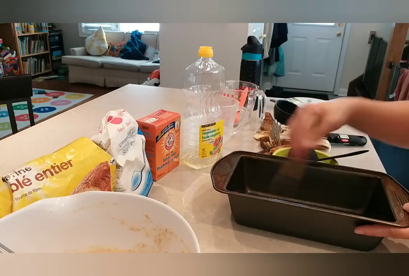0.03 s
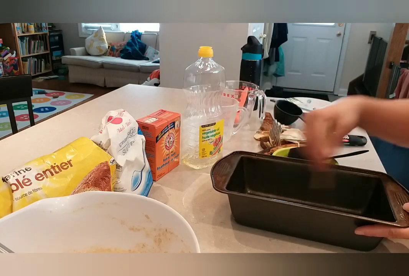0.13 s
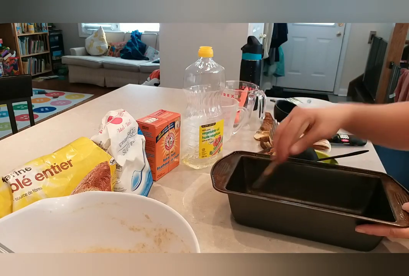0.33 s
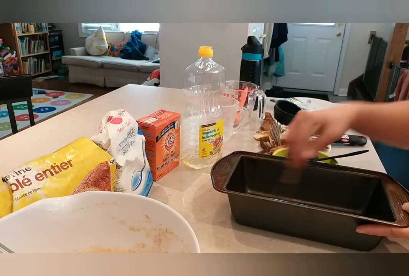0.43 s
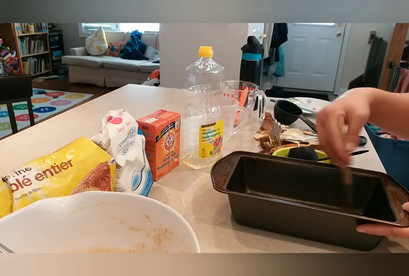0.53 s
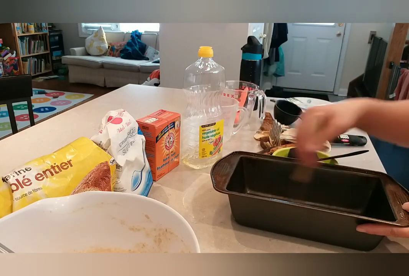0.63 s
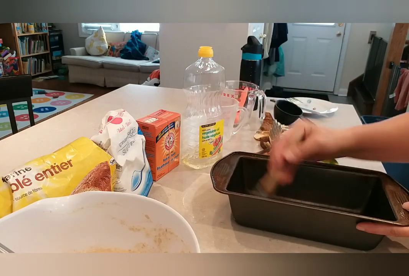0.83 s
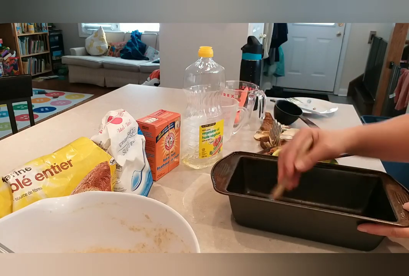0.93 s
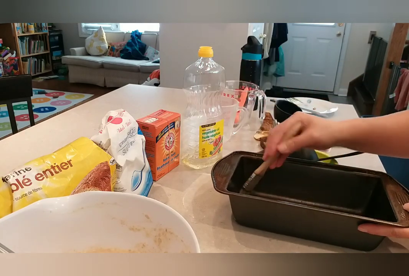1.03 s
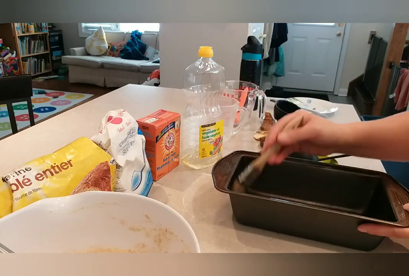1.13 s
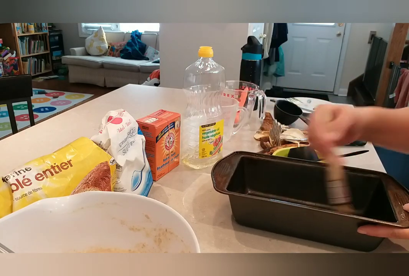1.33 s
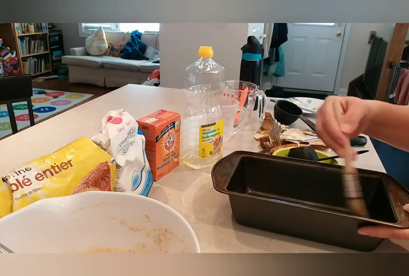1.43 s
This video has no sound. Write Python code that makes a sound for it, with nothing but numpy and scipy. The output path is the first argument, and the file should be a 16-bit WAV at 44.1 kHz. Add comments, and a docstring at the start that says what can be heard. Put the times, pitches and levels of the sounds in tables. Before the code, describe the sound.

A pastry brush rubs the inside of a metal loaf pan in quick, hissing strokes. It knocks the wall twice early on, each clank ringing briefly. Heard from nearby in a kitchen with a faint appliance hum.

```python
"""Bristles hiss over metal: a pastry brush greases a thin loaf pan, about six strokes a second.
Friction and tiny bristle flicks make the hiss; pressure drives the sheet and its modes.
An appliance hums faintly in the kitchen throughout.
Twice the brush knocks the wall and rebounds; the hand-held pan clanks and rings briefly."""
import sys
import numpy as np
from scipy import signal
from scipy.fft import rfft, irfft
from scipy.io import wavfile

SR = 44100
rng = np.random.default_rng(int(sys.argv[2]) if len(sys.argv) > 2 else 0)


def to_wav(sig):
    """Store sig (one row per channel, or 1-D mono) as 16-bit WAV at the path in sys.argv[1].

    Samples outside -1..1 are clipped; the rate is SR.
    """
    pcm = np.clip(np.atleast_2d(sig), -1, 1) * 32767
    pcm = np.round(pcm).astype(np.int16)
    wavfile.write(sys.argv[1], SR, pcm.T)  # frames by channels


N = 66150
TIME_S = np.arange(N) / SR
FREQ_HZ = np.fft.rfftfreq(N, 1 / SR)

# brush strokes: (peak time [s], rise width [s], fall width [s], level [dB], pressure re level [dB])
STROKES = [(-.01, 0.054, 0.036, -45, 3.5), (.095, 0.026, 0.047, -40.5, -2), (.278, 0.049, 0.03, -42, 10),
           (0.452, 0.036, 0.05, -42.5, 1), (.635, 0.046, 0.12, -46, 1), (.78, 0.021, 0.051, -47.5, 2.5),
           (0.973, 0.061, 0.019, -49, -3), (1.11, 0.043, 0.042, -45, 1.5),
           (1.245, 0.022, 0.037, -33.5, 1.5), (1.483, 0.036, .05, -40.5, 0)]
# bristle-tip hiss: (frequency [Hz], gain [dB])
BRISTLE_SPECTRUM = [(1000, -27), (2500, -8), (4500, -8.5), (6200, -5.5), (7000, 1), (8700, 5.8), (10000, 2),
                    (11200, -1.5), (15500, -0.5)]
# rubbed sheet metal: (frequency [Hz], gain [dB])
SHEET_SPECTRUM = [(250, -23.5), (600, -13.5), (1100, -15), (1600, -11.5), (2400, -14.5), (3600, -7),
                  (5000, -11), (8000, -18), (15000, -48)]
# clear pan modes, close pairs beating:
# (frequency [Hz], t60 [s], level at spot 1 [dB], level at spot 2 [dB], relative rubbed gain [dB])
PAN_MODES = [(407, 0.052, -28, -27.5, -46), (468.6, 0.15, -39.5, -22, -24.5), (473.5, 0.083, -22, -30, -38),
             (636.6, 0.33, -35.5, -34, -59), (744, .6, -35.5, -54, -52), (753.5, .6, -35, -44, -52),
             (849, .22, -28.5, -31, -40), (876, .048, -28, -17, -26), (942, .048, -23, -16.5, -24),
             (1081, 0.1, -24, -34, -45), (1120, 0.18, -31, -32, -21), (1433, 0.31, -32, -42, -33),
             (1549, 0.073, -22, -24.5, -35), (1774, 0.31, -31.5, -37.5, -30.5),
             (1795, 0.53, -39, -42.5, -53), (2018, 0.068, -21.5, -25.5, -30), (2255, 0.38, -35, -50, -44),
             (2336, 0.14, -24.5, -38, -56), (2627, 0.12, -21.5, -31.5, -46), (2842, 0.18, -31, -35.5, -28),
             (2984, 0.12, -27, -45, -45), (3082, 0.39, -35.5, -64, -49), (3080, 0.15, -21, -38, -56),
             (3281, 0.034, -36, -16, -23), (3347, 0.25, -25, -45, -36.5), (3710, 0.15, -22, -28, -31.5),
             (4012, 0.23, -29, -33, -33), (4580, .2, -28, -35, -38), (5290, 0.17, -38, -46, -26),
             (6245, 0.16, -54, -36, -30), (7900, 0.13, -43, -48, -28), (10000, 0.059, -31, -32.5, -29)]
# kitchen decay: (frequency [Hz], t60 [s])
ROOM_DECAY = [(300, 0.8), (800, 0.51), (2000, 0.4151), (4000, 0.4637), (8000, 0.46), (15000, 0.5)]
# reverb colour: (frequency [Hz], gain [dB])
ROOM_SPECTRUM = [(350, -6), (800, 3), (2000, 5), (4000, 4), (6000, -4.5), (9000, 1), (14000, -4.5)]
# room air: (frequency [Hz], gain [dB])
AIR_SPECTRUM = [(20, -54), (40, -48.5), (60, -41), (110, -47.5), (200, -34.5), (300, -47), (430, -46.5),
                (650, -45.5), (1100, -53.5), (2500, -61.5), (6000, -60.5), (15000, -95)]
# appliance hum: (frequency [Hz], rms level [dB])
HUM_LINES = [(85.5, -67), (171, -67), (214, -67), (236, -66), (645, -68.5)]
# wall knocks, one per spot: (time [s], level [dB], clank t60 [s], crack gain [dB], room gain [dB])
KNOCKS = [(.1998, -2, 0.15, 3, -13), (.6857, -3.5, 0.11, 5, -12.5)]
# crowded short-lived pan modes: (frequency [Hz], gain at spot 1 [dB], gain at spot 2 [dB])
CLANK_SPECTRA = [(270, -47, -31), (405, -19, -10), (448, -8.5, -16), (545, -13.5, -14.5), (835, -9.5, -6.5),
                 (1250, -9, -13.5), (1820, -9, -11.5), (2610, -10.5, -17), (3880, -9.5, -13.5),
                 (4100, -16, -29), (4610, -7, -22), (5600, -14, -18), (6600, -12, -26), (7900, -7, -14.5),
                 (9580, -11.5, -18), (10580, -17, -31), (15700, -22, -34)]
# stereo side signal: (frequency [Hz], gain re mid [dB])
SIDE_SPECTRUM = [(2000, -54), (3300, -49), (3900, -16.5), (4500, -12.5), (5500, -12), (6300, -43),
                 (7200, -62), (13700, -56), (14500, -16), (15800, -16)]

HOLLOW_DB, HOLLOW_T60_S = -7.5, 0.096  # echoes between the pan's walls


def from_db(db):
    """Decibels to gain."""
    return 10 ** (np.asarray(db) / 20)


def unit_rms(x):
    """Scale to unit rms."""
    return x / np.sqrt(np.mean(x ** 2) + 1e-20)


def per_bin(points):
    """Interpolate (frequency, value) points at the FFT bins, in log frequency."""
    hz, values = np.transpose(points)
    return np.interp(np.log(np.maximum(FREQ_HZ, 1)), np.log(hz), values)


def coloured(x, spectrum):
    """Filter by a gain curve."""
    return irfft(rfft(x) * from_db(per_bin(spectrum)), N)


def noise(spectrum):
    """Coloured Gaussian noise."""
    return coloured(rng.standard_normal(N), spectrum)


def decay(start_s, t60_s):
    """Sudden onset, exponential decay."""
    return (TIME_S >= start_s) * np.exp(-np.log(1000) * np.maximum(TIME_S - start_s, 0) / t60_s)


def echoes(x, response):
    """Convolve with a response scaled to unit energy."""
    return signal.fftconvolve(x, response / np.sqrt(np.sum(response ** 2)))[:N]


def bristle_grain(flicks_per_s=4500, spread_db=1.5, flick_db=-3):
    """Smooth friction plus tiny random bristle flicks."""
    sizes = from_db(-spread_db * np.minimum(rng.exponential(1, N), 5))
    signs = rng.choice([-1, 1], N)
    flicks = sizes * signs * (rng.random(N) < flicks_per_s / SR)
    return unit_rms(rng.standard_normal(N) + from_db(flick_db) * unit_rms(flicks))


def brush(room_db=-13.5):
    """Hiss follows brush speed; pressure makes the sheet sound along."""
    speed, pressure = np.zeros(N), np.zeros(N)
    for peak_s, rise_s, fall_s, level_db, pressure_db in STROKES:
        offset = (TIME_S - peak_s) / np.where(TIME_S < peak_s, rise_s, fall_s)
        swell = from_db(level_db) * np.exp(-0.5 * np.abs(offset) ** 2.4)  # flat-topped bell
        speed += swell
        pressure += swell * from_db(pressure_db)
    hiss = speed * coloured(bristle_grain(), BRISTLE_SPECTRUM)
    sheet = pressure * coloured(bristle_grain(), SHEET_SPECTRUM)
    rings = sum(from_db(rub_db) * pan_mode(sheet, hz, t60_s) for hz, t60_s, _, _, rub_db in PAN_MODES)
    hollow = from_db(HOLLOW_DB) * pan_hollow(hiss + sheet)
    direct = hiss + sheet + rings / np.sqrt(len(PAN_MODES)) + hollow
    return direct + from_db(room_db) * kitchen(direct)


def pan_mode(drive, hz, t60_s):
    """Damped resonance; a unit click rings a sine of height 1."""
    radius = np.exp(-np.log(1000) / (t60_s * SR))
    angle = 2 * np.pi * hz / SR
    return signal.lfilter([0, np.sin(angle)], [1, -2 * radius * np.cos(angle), radius ** 2], drive + 1e-18)


def pan_hollow(x):
    """Dense, short echoes between the pan's walls."""
    return echoes(x, rng.standard_normal(N) * decay(0, HOLLOW_T60_S))


def pan_radiation(x, cutoff_hz=335):
    """Steep loss below the pan's lowest modes."""
    return signal.sosfilt(signal.butter(7, cutoff_hz, "high", fs=SR, output="sos"), x)


def room_tail(steady_noise, start_s, build_s=0.0032):
    """Reverberant tail: builds up, then dies band by band."""
    spectrum = rfft(coloured(steady_noise, ROOM_SPECTRUM))
    centres_hz, t60s_s = np.transpose(ROOM_DECAY)
    bands = [per_bin(np.c_[centres_hz, weights]) for weights in np.eye(len(centres_hz))]
    tail = sum(irfft(spectrum * band, N) * decay(start_s, t60_s) for band, t60_s in zip(bands, t60s_s))
    return tail * (1 - np.exp(-np.maximum(TIME_S - start_s, 0) / build_s))


def kitchen(x):
    """Room reverberation, unit-energy response."""
    return echoes(x, room_tail(rng.standard_normal(N), 0, build_s=0.0028))


def appliance_hum(half_width_hz=7.5):
    """Wavering hum: narrow bands of noise."""
    hum = np.zeros(N)
    for hz, level_db in HUM_LINES:
        band = rfft(rng.standard_normal(N)) / (1 + ((FREQ_HZ - hz) / half_width_hz) ** 2)
        hum += from_db(level_db) * unit_rms(irfft(band, N))
    return hum


def chatter(start_s, contacts=5, gap_s=0.003, loss_db=3.5, t60_s=0.0085):
    """Envelope of the brush rebounding on the wall, each contact weaker."""
    gaps_s = gap_s * rng.uniform(0.8, 1.25, contacts)
    lags_s = np.cumsum(gaps_s) - gaps_s[0]
    return sum(from_db(-loss_db * k) * decay(start_s + lag_s, t60_s) for k, lag_s in enumerate(lags_s))


def knocks(tilt_db_per_oct=4, pivot_hz=3000, ring_room_db=-19):
    """Bright contact cracks, a clank of crowded modes, clear rings; each spot has its own colour."""
    impacts, rings = np.zeros(N), np.zeros(N)
    for spot, (start_s, level_db, clank_t60_s, crack_db, room_db) in enumerate(KNOCKS):
        colour = [(hz, spot_db[spot]) for hz, *spot_db in CLANK_SPECTRA]
        bright = [(hz, db + tilt_db_per_oct * np.log2(hz / pivot_hz)) for hz, db in colour]
        clank = noise(colour) * decay(start_s, clank_t60_s)
        crack = from_db(crack_db) * noise(bright) * chatter(start_s)
        reverb = from_db(room_db) * room_tail(noise(colour), start_s)
        impacts += from_db(level_db) * (clank + crack + reverb)
        blow = np.arange(N) == int(start_s * SR)
        for k, (hz, t60_s, *spot_db, _) in enumerate(PAN_MODES):
            rings += (-1) ** k * from_db(spot_db[spot]) * pan_mode(blow, hz, t60_s)
    return impacts + rings + from_db(ring_room_db) * kitchen(rings)


def scene(diffuse_db=-3.5):
    """Pan, room air and hum; near mono, two treble bands lean right."""
    mid = pan_radiation(brush() + knocks()) + noise(AIR_SPECTRUM) + appliance_hum()
    side = coloured(mid + from_db(diffuse_db) * pan_hollow(mid), SIDE_SPECTRUM)
    return np.array([mid - side, mid + side])


def record(dry):
    """Soft clip, then low-pass."""
    ceiling, cutoff_hz = 0.7, 15900
    rounded = ceiling * np.tanh(dry / ceiling)
    return signal.sosfilt(signal.cheby1(14, 0.2, cutoff_hz, fs=SR, output="sos"), rounded)


dry = scene()
out = record(dry)
to_wav(out)
```